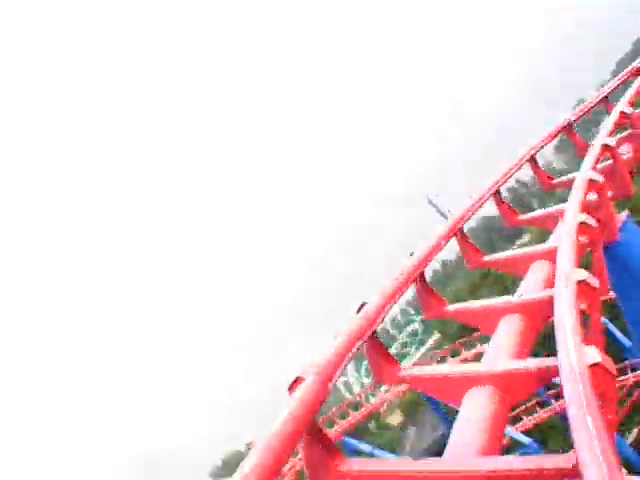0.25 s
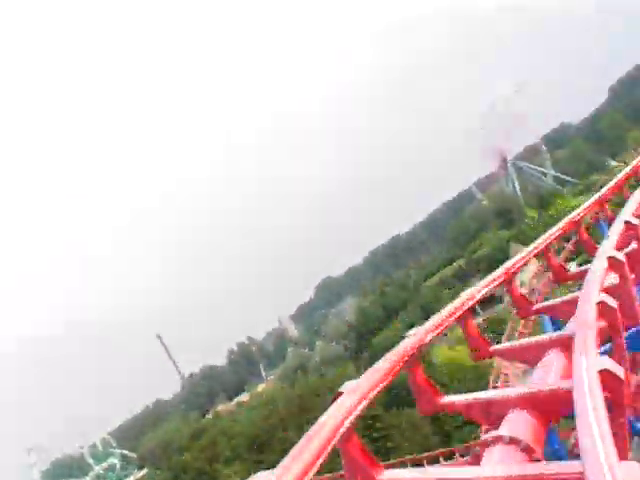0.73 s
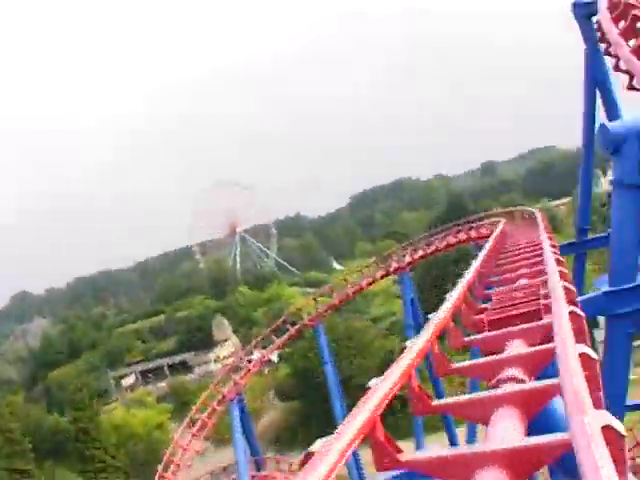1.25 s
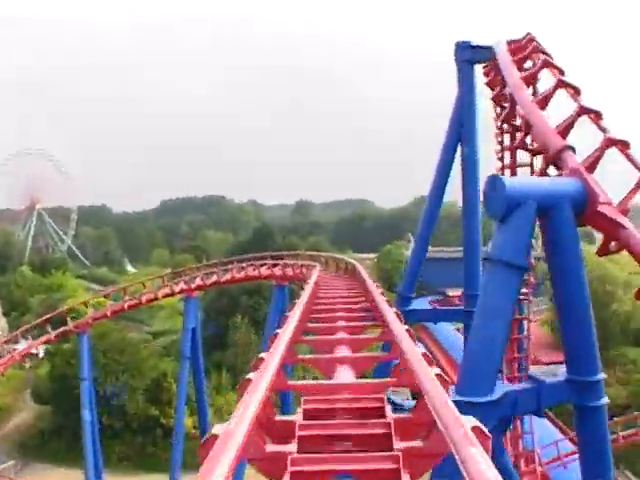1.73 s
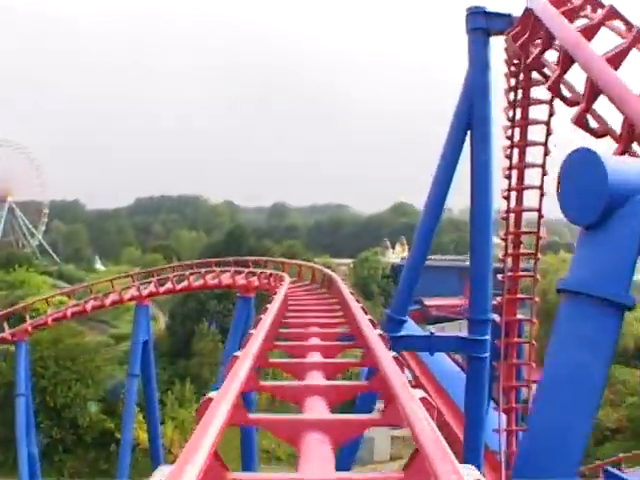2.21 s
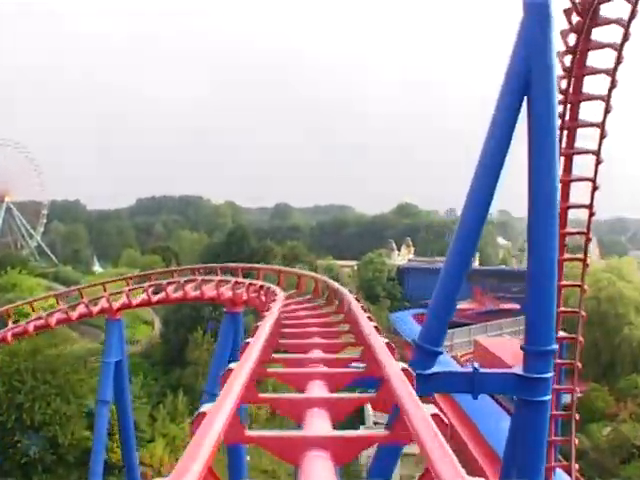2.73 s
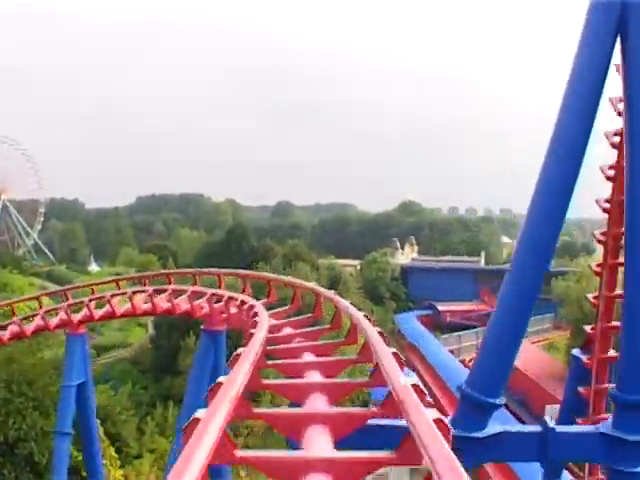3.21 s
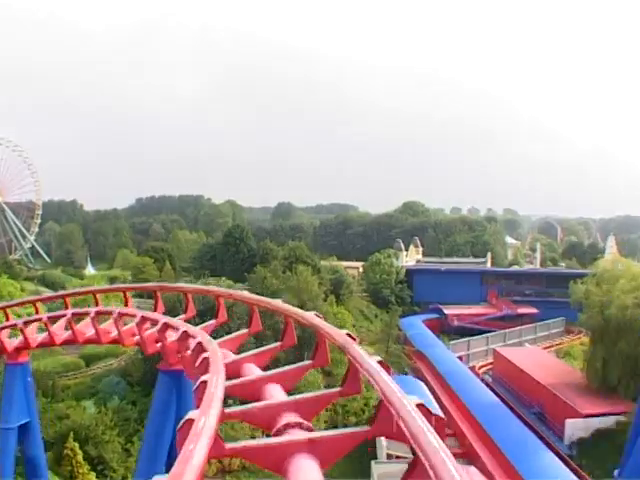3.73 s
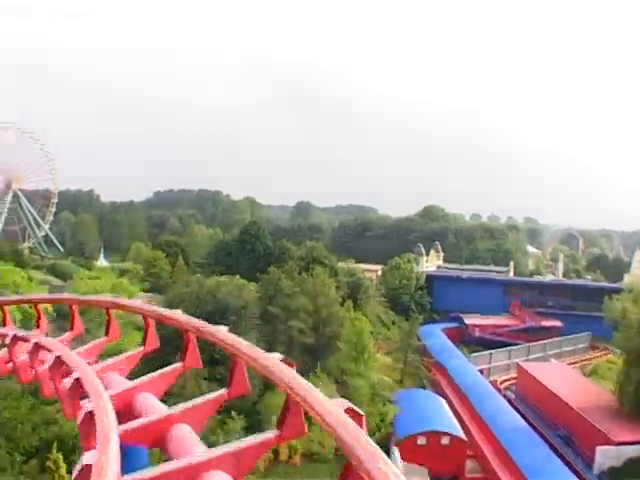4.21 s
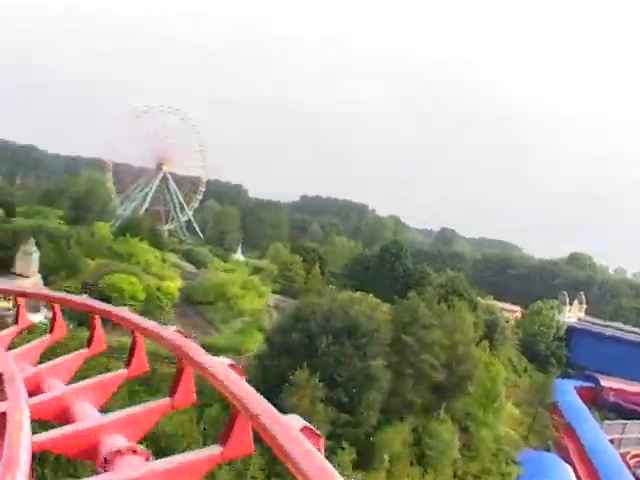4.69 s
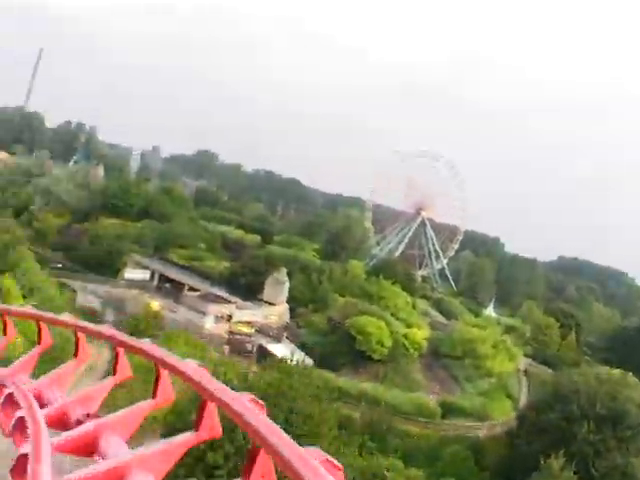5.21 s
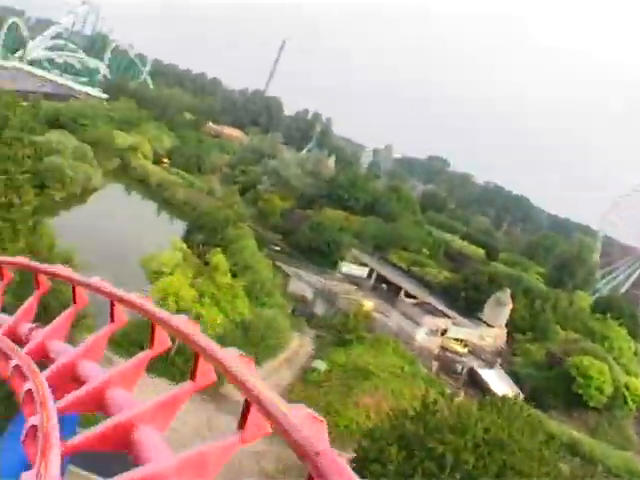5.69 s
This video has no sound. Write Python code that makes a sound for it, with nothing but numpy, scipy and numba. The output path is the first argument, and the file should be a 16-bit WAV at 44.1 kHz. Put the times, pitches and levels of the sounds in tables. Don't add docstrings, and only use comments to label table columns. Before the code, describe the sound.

On board a steel roller coaster outdoors, low wind buffets and flutters against a hand-held microphone, nearly covering the wheels' hollow roar. Knocks, dry ticks and air thumps come irregularly. The wheel noise eases, surges briefly at two and a half seconds, then grows from four seconds in a curve, with short wavering rail tones and metallic rattles. Faint buzz and hiss stay underneath.

```python
import sys
import numpy as np
from scipy import signal
from scipy.fft import rfft, irfft, next_fast_len
from scipy.io import wavfile
from scipy.ndimage import uniform_filter1d
from numba import njit

SR = 44100
rng = np.random.default_rng(int(sys.argv[2]) if len(sys.argv) > 2 else 0)


def output_pcm(signal):
    pcm = np.clip(np.atleast_2d(signal).T, -1, 1) * 32767
    wavfile.write(sys.argv[1], SR, np.round(pcm).astype(np.int16))


def makeup_ratio(level_db):
    decades = np.asarray(level_db, float) / 20
    return 10 ** decades


N = 262395


def level(x):
    return x / np.sqrt(np.mean(x ** 2))


def peak(x):
    return x / np.abs(x).max()


def curves(table):
    s, *columns = np.transpose(table)
    return [np.interp(np.arange(N) / SR, s, c) for c in columns]


@njit
def svf(x, hz, width):
    y, b, l = np.empty(len(x)), 0., 0.
    g, k = np.tan(np.pi * hz / SR), width / hz
    for i in range(len(x)):
        v = (b + g * (x[i] - l)) / (1 + g * (g + k))
        b, l, y[i] = 2 * v - b, l + 2 * g * v, k * v
    return y


def band(x, hz, width):
    hz, width = float(hz), float(width)
    return svf(svf(x, hz, width), hz, width)


@njit
def follow(x, attack, release):
    y, e = np.empty(len(x)), .3
    for i in range(len(x)):
        e += (abs(x[i]) - e) * (attack if abs(x[i]) > e else release)
        y[i] = e
    return y


def walk(rate):
    hold = int(SR / rate)
    steps = np.repeat(rng.standard_normal(N // hold + 1), hold)
    return level(uniform_filter1d(uniform_filter1d(steps, hold), hold)[:N])


def colour(x, shape):
    hz, db = np.transpose(shape)
    size = next_fast_len(N)
    at = np.log(np.arange(size // 2 + 1) * SR / size + 1)
    gain = makeup_ratio(np.interp(at, np.log(hz), db, left=-120, right=-120))
    return level(irfft(rfft(x, size) * gain, size)[:N])


def ring(x, modes):
    return level(sum(makeup_ratio(db) * level(band(x, hz, 1.4 * width)) for hz, width, db in modes))


def grit(rate, spread_db):
    return rng.standard_normal(N) * makeup_ratio(spread_db * walk(rate))


def swell(t, length, attack, release):
    return np.clip(t / attack, 0, 1) * np.exp(-np.maximum(t - length, 0) / release)


def wind():
    # start_s, gust_db, small_eddies_re_gust_db, air_speed_rush_db
    gusts = [(0, -17, -2, -2), (.2, -15.5, -6, 1.5), (.45, -15.5, -7.5, 0), (.9, -15.5, -10, 1.5),
             (1.35, -13.5, -14, 1), (1.7, -15.5, -13.5, 1), (2.2, -14, -13, -3), (2.7, -16.5, -12, 2),
             (3.3, -17, -12, -2), (3.85, -14, -13.5, -4), (4.3, -15, -12.5, -1), (4.8, -13.5, -11.5, 0.5),
             (5.3, -12, -12.5, -2.5), (5.6, -16.5, -9.5, 1.5), (5.95, -14.5, -9.5, -2)]
    # start_s, length_s, buffet_change_db, eddies_re_buffet_change_db
    surges = [(0.304, 0.019, -8.5, 9.5), (1.186, 0.018, -3, 3), (1.448, 0.037, -7, 4),
              (1.607, 0.026, -8.5, 8), (1.71, 0.07, -6, 7), (1.915, 0.013, -6.5, 12),
              (2.021, 0.025, 2.5, 1.5), (2.086, 0.051, -5, 4.5), (2.788, 0.018, -5, 1),
              (2.97, 0.065, -3.5, 2.5), (3.142, 0.017, 5.5, 1.5), (3.291, 0.06, -2, 3),
              (3.452, 0.075, 4, 0), (3.659, 0.031, -4.5, -1.5), (3.747, 0.028, 4, 1),
              (3.958, 0.057, -5, 6.5), (4.123, 0.042, 3.5, -5.5), (4.195, 0.073, -7, 6.5),
              (4.448, 0.039, 3, 1), (4.593, .02, -5, 5), (4.77, 0.036, 3.5, 1), (5.042, 0.012, -2.5, 0.5),
              (5.07, 0.024, -8.5, 6), (5.146, 0.015, 1, 4.5), (5.256, 0.013, 0.5, 8),
              (5.389, .02, -6.5, 6.5), (5.618, 0.017, -1, -1), (.055, .03, 0, -0.5), (0.363, .03, -1, -0.5),
              (0.445, 0.034, 2, -5), (0.887, 0.0316, 0, -4), (1.03, 0.027, -4.5, 5.5), (1.266, 0.028, 1, 4),
              (1.376, 0.036, -5.5, 5.5), (2.215, .03, 0, 0.5), (2.351, .03, -2.5, -3),
              (2.479, .03, -2.5, 1), (3.398, 0.037, 2, 0), (3.542, 0.025, -2, 4), (3.691, 0.036, -1.5, 3),
              (3.818, 0.047, 1.5, 2), (4.022, 0.027, 1.5, -1.5), (4.333, 0.032, 0.5, -3.5),
              (4.505, .035, 0.5, 1), (4.684, 0.027, -1, 2.5), (4.857, .035, 2.5, -6.5),
              (4.97, .035, 0, -4.5), (5.914, .04, -6, 4)]
    # start_s, large_eddies_db
    eddies = [(0, -2), (.4, 1.5), (.75, 4.5), (1.1, 0), (1.45, -2), (1.8, -0.9), (2.2, 2.5), (2.55, 0.2),
              (2.9, 0.5), (3.25, 0.3), (3.65, -0.5), (3.9, -1.5), (4.2, 2), (4.45, -0.5), (4.8, 0.2),
              (5.15, 4), (5.6, 1), (5.95, -1)]
    # freq_hz, density_db
    spectrum = [(12, -72), (20, -29), (43, -16.5), (60, -11), (81, -2), (161, -13.5), (189, -15),
                (268, -15.5), (381, -26.5), (419, -32), (595, -39.5), (644, -41), (900, -50), (1170, -66),
                (1980, -120)]
    buffet_db, flutter_db, speed_db = curves(gusts)
    for s, length, surge_db, eddy_db in surges:
        surge = swell(np.arange(N) / SR - s, length, 0.0092, 0.011)
        buffet_db = buffet_db + surge_db * surge
        flutter_db = flutter_db + eddy_db * surge
    rush_db = -12.5 + speed_db + 1.206 * flutter_db + 0.32 * walk(13)
    push_db = -21.5 + 5 * walk(11)

    air = colour(rng.standard_normal(N), spectrum)
    push = colour(air, [(15, -5.5), (45, 6.0), (60, -30.0)])
    buffet = colour(air, [(40, -25.0), (55, 1.5), (175, 5.5), (230, -36.0)])
    flutter = colour(air, [(150, -23.0), (195, 1.0), (400, -1.5), (480, -14.5)])
    rush = colour(air, [(340, -24.5), (420, 3.5), (1900, 4.5)])

    size_db, = curves(eddies)
    split_hz = 89
    large = signal.sosfiltfilt(signal.butter(2, split_hz, fs=SR, output="sos"), buffet)
    buffet = level(makeup_ratio(size_db) * large + makeup_ratio(-size_db) * (buffet - large))
    buffet_size = uniform_filter1d(np.abs(signal.hilbert(buffet)), size=1600)
    buffet = level(buffet / (buffet_size + .5) ** .5)
    flutter = level(flutter / (uniform_filter1d(np.abs(flutter), size=2000) + .4) ** 0.54)
    lumps = makeup_ratio(1.55 * walk(60))
    small = makeup_ratio(flutter_db + 0.64) * flutter + makeup_ratio(rush_db + 2.5) * rush
    return makeup_ratio(buffet_db) * (makeup_ratio(2.0) * buffet + lumps * small + makeup_ratio(push_db + 0.5) * push)


def wheels():
    # start_s, roar_db, side_slip_hiss_db
    load = [(0, -45.5, 1.5), (.5, -46.5, -0.5), (1.0, -48, -1), (1.4, -50, -1.5), (1.55, -48, -0.5),
            (1.95, -48, 0.5), (2.05, -49.5, -0.5), (2.4, -49.5, 0), (2.5, -43.5, 0), (2.8, -50.5, -1.5),
            (3.2, -51.5, -1), (3.5, -51, 1.5), (3.95, -48, 0.5), (3.99, -44, 3.5), (4.65, -43, 5.5),
            (5.0, -44, 1.5), (5.4, -43.5, -0.5), (5.95, -41.5, 0.5)]
    # freq_hz, density_db
    roar_shape = [(500, 0), (700, -4.5), (820, -1.5), (910, 1.5), (1000, -0.5), (1200, -4), (1400, -9.5),
                  (2000, -15), (2600, -20)]
    # freq_hz, width_hz, level_db
    rail_modes = [(1503, 34, -3.5), (1580, 190, -3), (1720, 300, -3.5)]
    # freq_hz, density_db
    hiss_shape = [(1500, 5), (1900, 5), (2600, 4), (3300, -1.5), (4400, -1), (5200, -7), (6200, -9),
                  (6900, -29), (7700, -19.5), (8600, -30.5), (11000, -36.5)]
    roar_db, slip_db = curves(load)
    light_db = -51.
    rail_db = -58.5 + (roar_db - light_db)
    hiss_db = -56.5 + slip_db + .5 * walk(11)
    bumps = makeup_ratio(0.67 * walk(40))
    roar = colour(grit(90, 1.3) * bumps, roar_shape)
    rail = ring(grit(60, .8), rail_modes)
    hiss = colour(grit(150, 0.61) * bumps, hiss_shape)
    roar = makeup_ratio(roar_db + 3.0 + 0.58 * walk(12)) * roar
    return roar + makeup_ratio(rail_db - 1.5) * rail + makeup_ratio(hiss_db + 1.5) * hiss


def drum():
    # freq_hz, rms_db
    overtones = [(4651, -80), (4953, -82), (7197, -87), (7499, -88), (7800, -87), (7951, -89), (8102, -88),
                 (8253, -91), (8699, -91), (8850, -88), (9598, -86), (9900, -91), (10352, -92),
                 (10497, -92), (10799, -86), (10950, -86), (11553, -89), (11849, -90), (12452, -94),
                 (12602, -93), (12898, -91), (13049, -87), (13797, -92), (14099, -96), (14400, -96),
                 (14853, -89), (14998, -93), (15601, -92)]
    drum_hz, wobble_us = 150, 9.
    order = np.arange(14, 105)
    db = -93. + 3. * np.clip(rng.standard_normal(len(order)), -2, 1)
    for hz, line_db in overtones:
        db[order == round(hz / drum_hz)] = line_db + 2.5
    at = np.arange(4097) / 4096
    phase = 2 * np.pi * (order[:, None] * at + rng.random((len(order), 1)))
    turn = np.sqrt(2) * makeup_ratio(db) @ np.sin(phase)
    time = np.arange(N) / SR + wobble_us * 1e-6 * walk(11.0)
    return np.interp(time * drum_hz % 1, at, turn)


def tape_hiss():
    # freq_hz, density_db
    spectrum = [(4000, 2), (6000, 5), (7700, 8.5), (8700, 2), (9600, 6.5), (10400, 3), (11000, 6),
                (12500, 1.5), (13100, -0.5), (14000, -0.5), (15900, 1.5)]
    return makeup_ratio(-70) * colour(rng.standard_normal(N), spectrum)


def slaps():
    # start_s, peak_db, bright_part_db
    events = [(0.066, -33, -34), (0.106, -34, -34), (0.116, -29, -36), (0.233, -35, -34), (0.268, -32, -20),
              (0.392, -35, -30), (0.547, -36, -30), (0.616, -37, -34), (2.341, -30, -8), (2.708, -38, -9),
              (2.904, -32, -7), (3.104, -36, -14), (3.37, -38, -16), (3.47, -32, -5), (3.97, -34, -14),
              (4.292, -33, -20), (4.806, -33, -20), (5.047, -34, -18), (5.168, -30, -16), (5.283, -30, -18),
              (5.347, -33, -18), (5.222, -30, -14), (5.256, -31, -16)]
    out, t = np.zeros(N + 4096), np.arange(4096) / SR
    slap = np.exp(-t / .0003) * np.minimum(t / .0001, 1)
    low, high = peak(band(slap, 750, 1100)), peak(band(slap, 2400, 3200))
    for s, db, bright_db in events:
        out[int(s * SR):][:4096] -= makeup_ratio(db + 7.5) * (low + makeup_ratio(bright_db - 2.5) * high)
    return out[:N]


def thumps():
    # start_s, peak_db
    events = [(0.087, -24), (0.654, -15), (0.996, -14), (1.154, -18.5), (1.225, -15), (2.036, -19),
              (2.34, -26), (2.845, -15.5), (3.13, -11), (3.331, -26), (3.468, -10), (3.527, -14.5),
              (3.746, -17.5), (3.907, -17), (4.073, -19), (4.294, -13), (4.771, -21.5), (4.805, -15),
              (5.043, -19), (5.161, -5), (5.277, -11), (5.346, -8), (5.89, -25)]
    out, t = np.zeros(N + 2048), np.arange(2048) / SR
    drop_s = .0007
    swing = peak(band(t / drop_s * np.exp(-t / drop_s), 285, 220))
    for s, db in events:
        out[int(s * SR):][:2048] -= makeup_ratio(db - 3) * swing
    return out[:N]


def knocks():
    # start_s, peak_db, ring_db, thud_db, ring_pitch_hz
    events = [(0.3300, -46, 6, 0, 2800), (.345, -54, 4, -9, 2500), (0.4030, -51, -14, 10, 2500),
              (0.5590, -42, -8, -2, 2900), (0.563, -54, 5, 7, 2000), (0.8580, -49, -4, 6, 3700),
              (0.872, -59, 4, -9, 4200), (1.0960, -51, -10, 1, 2600), (1.4900, -37, -7, -3, 3300),
              (1.7694, -45, -12, 3, 2600), (1.9394, -43, -16, 5, 2900), (4.06, -58, 0, -9, 4500),
              (4.7745, -40, -17, 2, 2400), (5.219, -46, -5, 6, 4100), (5.258, -56, 0, -9, 4600),
              (5.448, -56, 0, -9, 4200), (1.306, -62, 5, -9, 4500), (1.572, -61, 5, -9, 4700),
              (.936, -62, 4, -9, 4700)]
    hold_s, t60_s = .008, .05
    out, t = np.zeros(N + 4096), np.arange(4096) / SR
    for s, db, ring_db, thud_db, hz in events:
        burst = rng.standard_normal(4096) * swell(t, hold_s, .001, t60_s / np.log(1000))
        body = peak(band(band(burst, 1900, 3200), 1900, 3200))
        pitched = peak(band(band(burst, hz, 700), hz, 700))
        thud = peak(band(burst, 1150, 1100))
        knock = body + makeup_ratio(ring_db - 1) * pitched + makeup_ratio(thud_db - 1) * thud
        out[int(s * SR):][:4096] += makeup_ratio(db + 3) * knock
    return out[:N]


def ticks():
    # start_s, peak_db, top_part_db
    events = [(0.3694, -59, -13), (0.9358, -55, -13), (1.1692, -55, -16), (1.2116, -52, -9),
              (1.3069, -52, -13), (1.4506, -56, -11), (1.5728, -54, -11), (1.6694, -56, -17),
              (4.2094, -52, -12), (4.6244, -52, -10), (4.7192, -47, -16), (5.1462, -55, -14),
              (4.567, -55, -10), (4.6065, -57, -4), (4.4, -57, -8), (4.214, -56, -8), (4.632, -56, -10),
              (4.0, -57, -8), (4.5249, -55, -10), (4.6885, -54, -8), (4.344, -57, -12), (4.918, -57, -8),
              (5.165, -58, -5), (5.5503, -53, -12)]
    out, t = np.zeros(N + 4096), np.arange(4096) / SR
    for s, db, top_db in events:
        crack = (t == 0) + .35 * rng.standard_normal(4096) * np.exp(-t / .0005)
        mid, top = peak(band(crack, 5500, 9000)), peak(band(crack, 12500, 9000))
        out[int(s * SR):][:4096] += makeup_ratio(db + 5) * (mid + makeup_ratio(top_db - 1.5) * top)
    return out[:N]


def bottoming():
    # start_s, peak_db
    events = [
        (.4414, -41),
        (4.4965, -36),
        (5.1474, -37),
        (5.175, -36),
        (5.2828, -42),
        (5.292, -36),
        (5.3213, -43),
    ]
    deaf, clicks = np.zeros(N), np.zeros(N)
    before_s, deaf_s, deaf_db = .009, .004, -11
    for s, db in events:
        deaf += swell(np.arange(N) / SR - s + before_s, deaf_s, .001, .001)
        clicks[int(s * SR)] = makeup_ratio(db)
    body = band(clicks, 3600, 6000)
    snaps = body * clicks.max() / body.max() + makeup_ratio(-11) * clicks
    return makeup_ratio(deaf_db * deaf), snaps


def rubs():
    # start_s, length_s, rms_db, pitch_hz
    events = [(.862, .05, -54, 1510), (.98, .02, -55, 1490), (2.55, .1, -57, 1410), (3.98, .03, -50, 1528),
              (4.02, .04, -53, 1620), (4.135, .025, -51, 1570), (4.254, .05, -45, 1491),
              (4.25, .05, -48, 1609), (4.44, .025, -50, 1715), (4.53, .035, -47, 1507),
              (4.535, .03, -50, 1590), (4.595, .075, -48, 1495), (4.785, .025, -51, 1610),
              (4.775, .095, -51, 1485), (4.9, .028, -51, 1610), (4.93, .02, -50, 1480),
              (4.967, .025, -45, 1485), (5.08, .03, -52, 1526), (5.337, .035, -51, 1475),
              (5.438, .06, -50, 1641), (5.452, .045, -51, 1480), (5.595, .03, -45, 1501),
              (5.692, .05, -51, 1765), (5.69, .025, -51, 1604), (3.973, .04, -51, 1277),
              (4.286, .025, -43, 950), (4.672, .04, -44, 900), (4.915, .025, -45, 880),
              (5.337, .018, -43, 880), (5.218, .02, -43, 900), (5.452, .03, -45, 880),
              (5.64, .035, -45, 880), (5.84, .06, -47, 930), (5.726, .035, -49, 1566),
              (5.832, .05, -46, 1609), (5.79, .06, -56, 1880), (4.84, .04, -53, 1760),
              (4.63, .04, -52, 1670), (5.53, .05, -53, 1600), (5.76, .04, -52, 1640),
              (4.38, .025, -47, 790), (4.44, .02, -48, 1050), (5.39, .03, -48, 930),
              (4.72, .025, -49, 1210)]
    out, t = np.zeros(N + 8192), np.arange(8192) / SR
    for s, length, db, hz in events:
        scrape, drift = rng.standard_normal((2, 8192))
        waver = 1 + .006 * level(svf(drift, 14., 20.))
        tone = np.sqrt(2) * np.sin(2 * np.pi * np.cumsum(hz * waver) / SR)
        tone = tone + makeup_ratio(-10) * ring(scrape, [(hz, .03 * hz, 0)])[::-1]
        out[int(s * SR):][:8192] += makeup_ratio(db + 1.5) * tone * swell(t, length, .004, .006)
    return out[:N]


def rattle():
    # start_s, length_s, squeak_db, jingle_db
    shakes = [(1.17, .025, -68, -82), (1.208, .006, -66, -76), (1.304, .012, -69, -71),
              (1.447, .01, -72, -74), (1.57, .015, -69, -71), (3.975, .04, -65, -73),
              (4.060, .02, -59, -75), (4.08, .035, -69, -73), (4.188, .035, -68, -80),
              (4.2, .018, -72, -71), (4.245, .02, -66, -78), (4.285, .015, -67, -80),
              (4.32, .025, -67, -80), (4.395, .015, -61, -73), (4.44, .015, -66, -76),
              (4.518, .012, -68, -70), (4.55, .025, -69, -78), (4.605, .012, -66, -72),
              (4.622, .012, -63, -67), (4.686, .018, -57, -66), (4.713, .012, -61, -67),
              (4.785, .015, -68, -80), (4.915, .012, -64, -76), (4.98, .025, -60, -81),
              (5.078, .015, -64, -77), (5.098, .025, -61, -80), (5.15, .015, -65, -84),
              (5.195, .03, -67, -74), (5.03, .02, -67, -80), (5.24, .02, -68, -86), (5.275, .01, -65, -84),
              (5.303, .01, -65, -84), (5.548, .02, -71, -73), (5.632, .022, -63, -75),
              (5.77, .06, -70, -74), (5.868, .065, -65, -69)]
    # freq_hz, width_hz, level_db
    squeak_modes = [(6070, 130, 0), (6280, 200, -3), (4450, 700, 0)]
    # freq_hz, width_hz, level_db
    jingle_modes = [(7700, 700, -2.5), (9400, 700, -1), (11100, 600, 0), (11700, 550, 0.5),
                    (13000, 1400, -4)]
    t, loaded_s = np.arange(N) / SR, 3.97
    loaded = np.clip((t - loaded_s) / .02, .1, 1)
    squeak_gain, jingle_gain = makeup_ratio(-76) * loaded, makeup_ratio(-80) * loaded
    for s, length, squeak_db, jingle_db in shakes:
        shake = swell(t - s, length, .002, .005)
        squeak_gain = squeak_gain + makeup_ratio(squeak_db) * shake
        jingle_gain = jingle_gain + makeup_ratio(jingle_db) * shake
    chatter = grit(250, 1.8)
    jingle = np.zeros(N)
    for hz, width, db in jingle_modes:
        part = ring(chatter * makeup_ratio(2.5 * walk(300)), [(hz, width, 0)])
        jingle += makeup_ratio(db + 2 * walk(30)) * part
    squeak = ring(chatter, squeak_modes)
    squeak = level(squeak / (uniform_filter1d(np.abs(squeak), size=400) + .7))
    return makeup_ratio(2.5) * (squeak_gain * squeak + jingle_gain * level(jingle))


def scene():
    hearing, snaps = bottoming()
    air = wind() + thumps() + slaps()
    train = hearing * (wheels() + rubs() + rattle()) + knocks()
    camera = snaps + ticks() + drum() + tape_hiss()
    return (air + train + camera)[None]


def top_cut(x):
    return signal.sosfilt(signal.butter(12, 15720, fs=SR, output="sos"), x)


def record(dry):
    x = dry[0]
    x = x * np.minimum(0.49 / follow(x, 0.028, 0.00029), 1) ** .5
    x = x + 0.2 * (x ** 2 - uniform_filter1d(x ** 2, size=4410))
    x = 0.63 * np.tanh(x / 0.8)
    return top_cut(x[None])


dry = scene()
out = record(dry)
output_pcm(out)
```